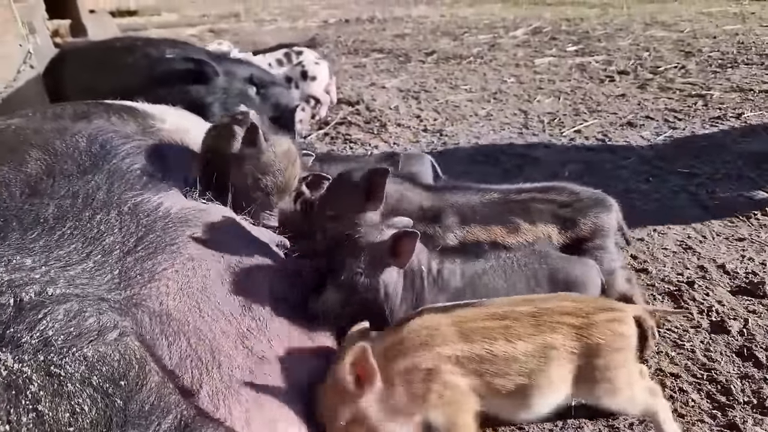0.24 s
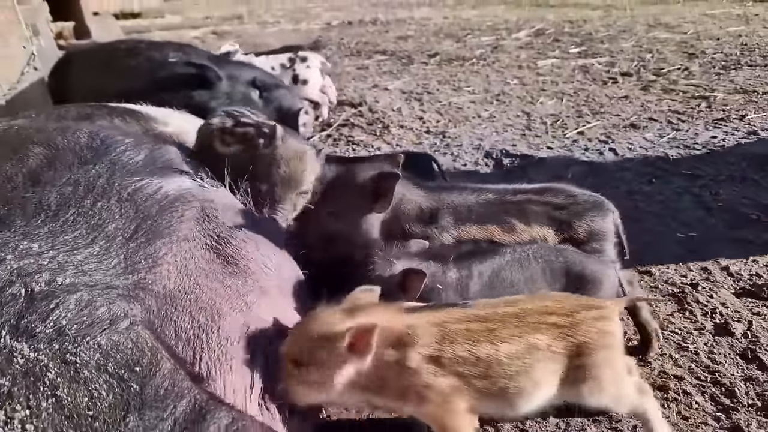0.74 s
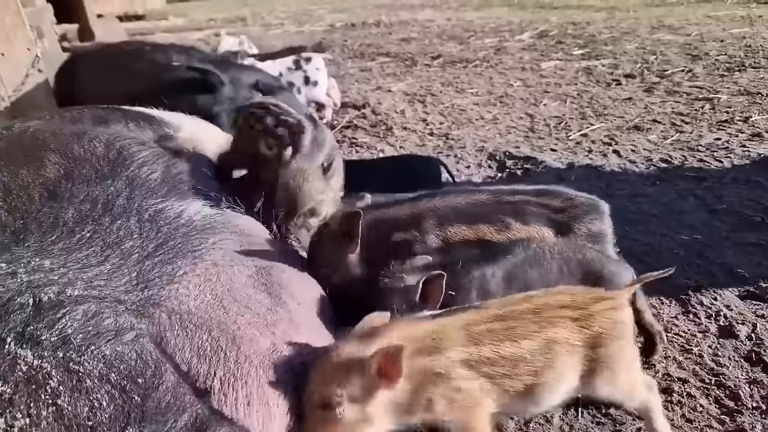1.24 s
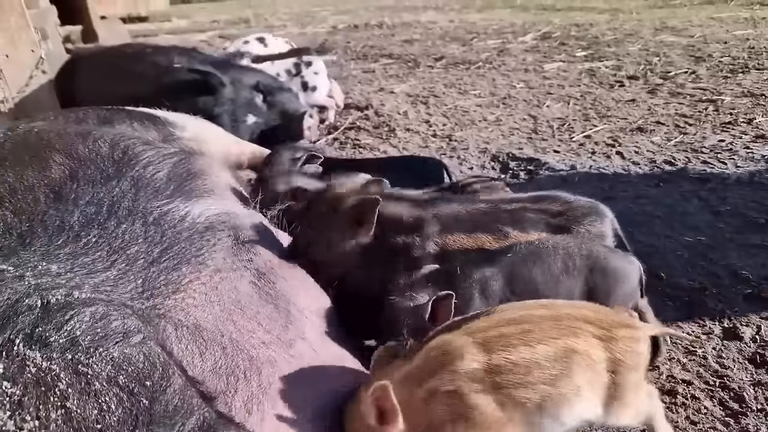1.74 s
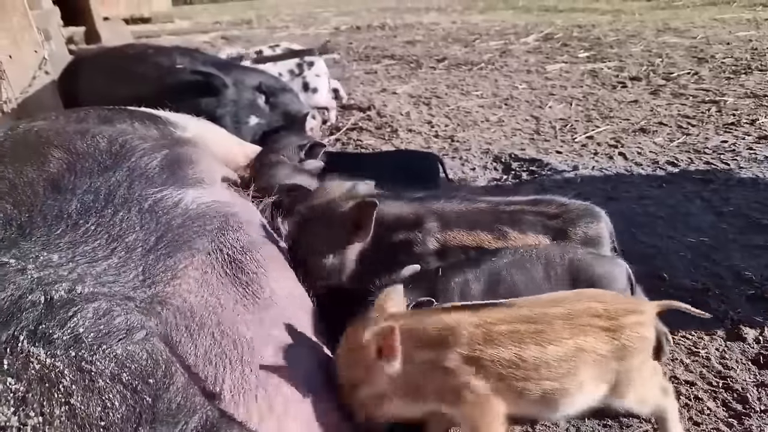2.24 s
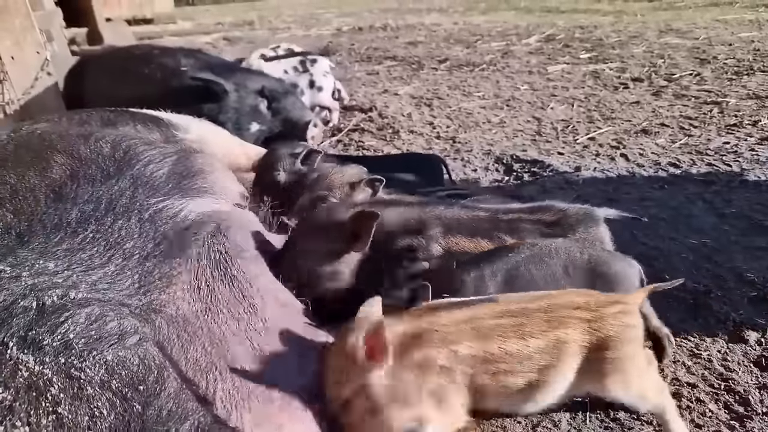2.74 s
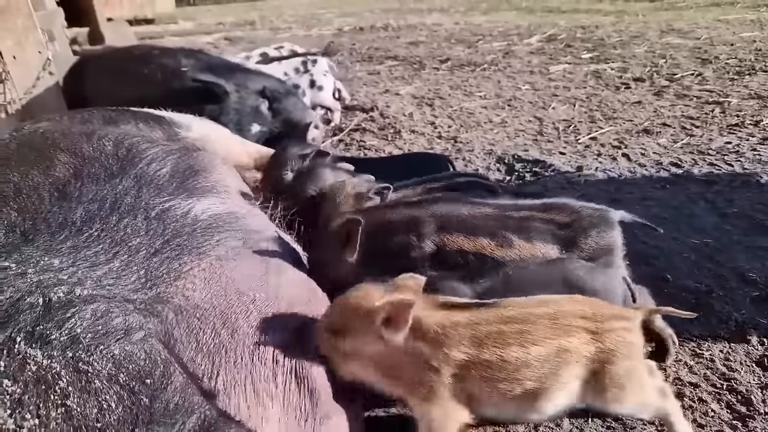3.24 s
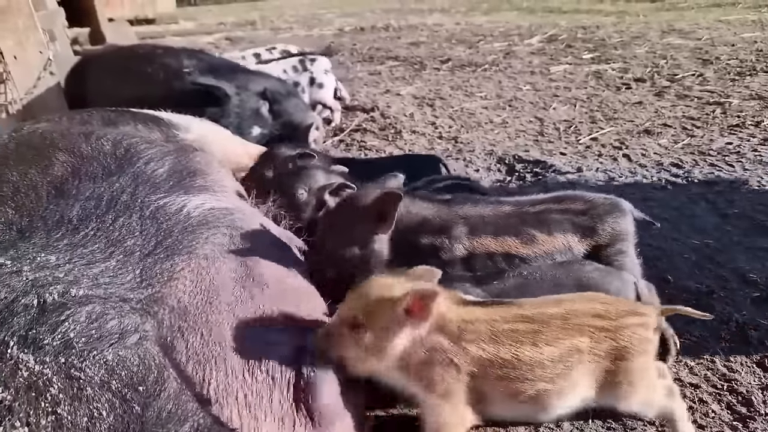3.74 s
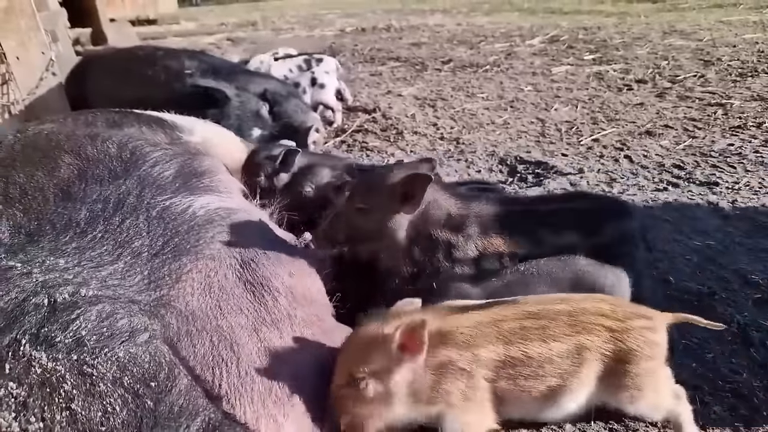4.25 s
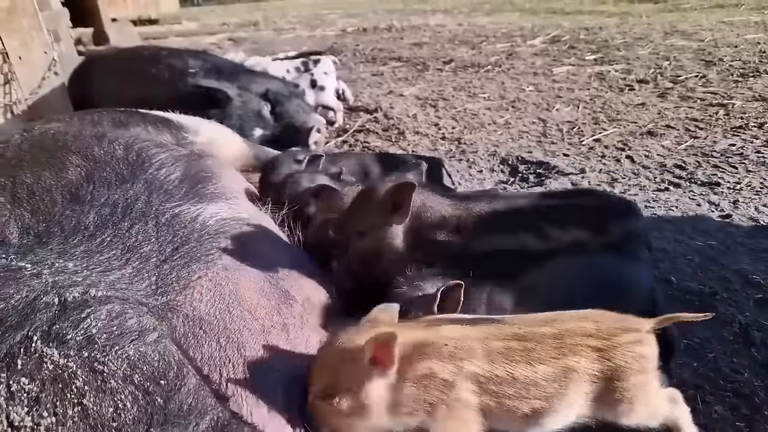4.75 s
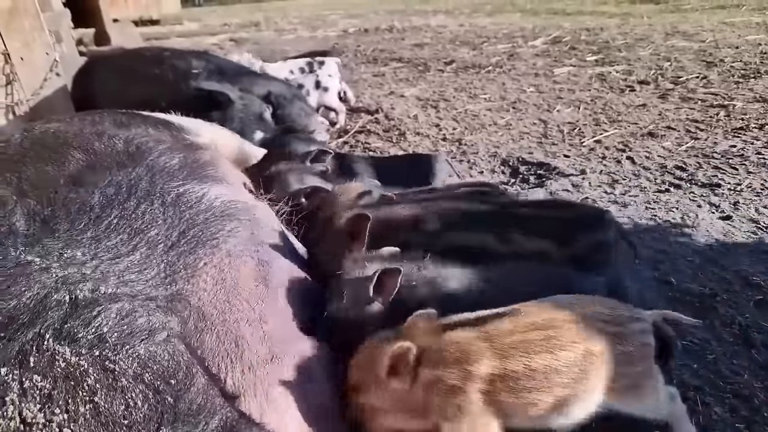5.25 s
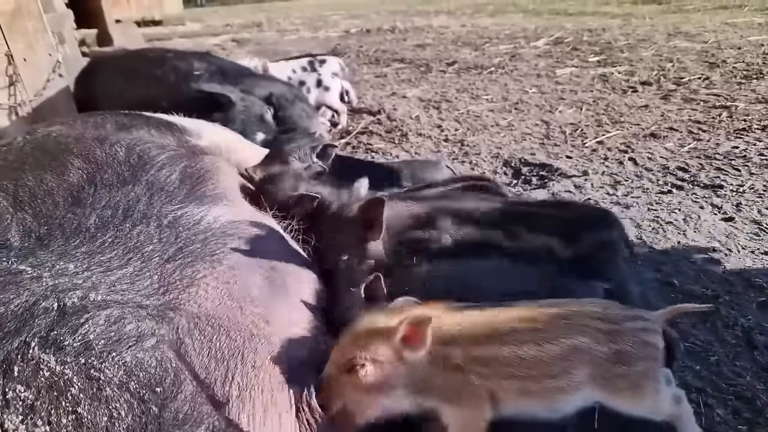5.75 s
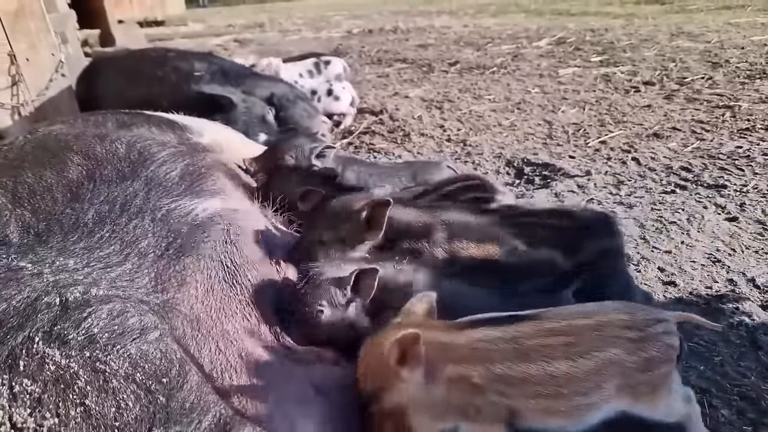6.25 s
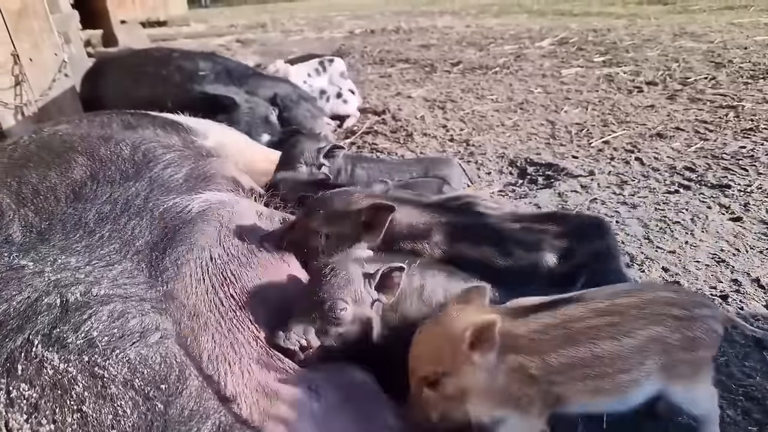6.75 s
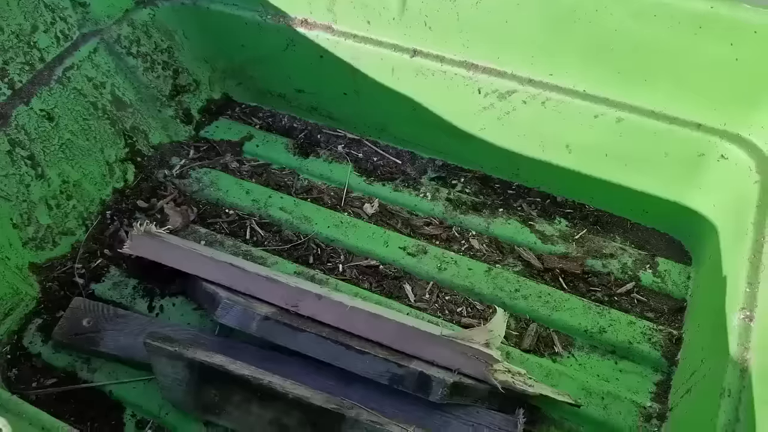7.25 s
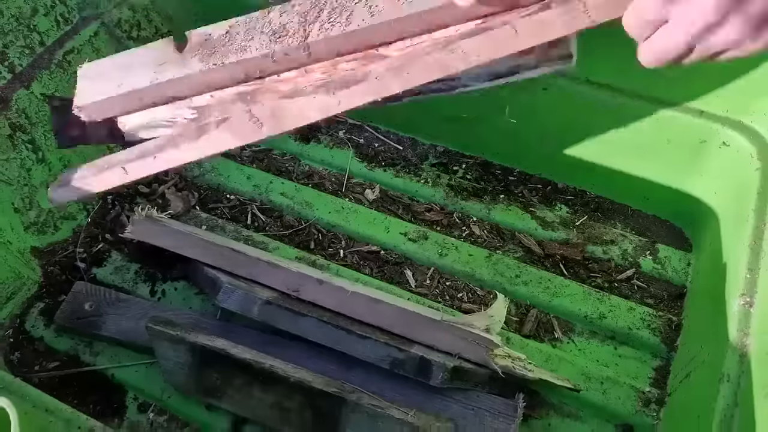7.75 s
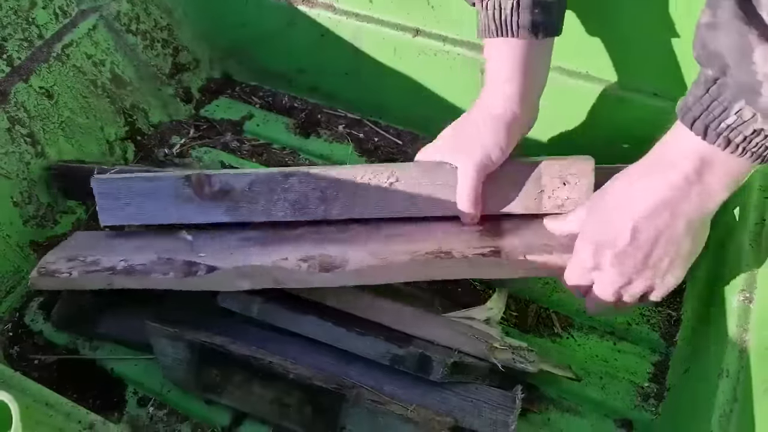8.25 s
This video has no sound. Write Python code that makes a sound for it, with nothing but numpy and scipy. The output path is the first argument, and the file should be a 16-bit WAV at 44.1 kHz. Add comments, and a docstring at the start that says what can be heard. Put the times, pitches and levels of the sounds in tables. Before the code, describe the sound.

A sunny farmyard heard close up, with low air rumble, faint rustling grit, distant leaves and wide, echoing birdsong. A sow grunts near the microphone in deep fluttering bursts: a longer one at 0.6 s, another at 1.1, short ones at 2.2 and 2.5, a run from 3.4 to 4.3, then around 4.9, 5.3 and a joined pair at 6.4. Piglets add wet little smacks, tiny grunts, dry ticks and trotter scuffs, busiest around 3 to 3.6 s, and a thin rising moan at 5.5. Birds chirp quickly around 1.5 to 2.7 s, then more sparsely. At about 7.17 s the near sound drops out for an instant and cuts to louder rustling as planks are carried, swelling near 7.7. A sharp crack comes at 7.4; from 8.0 to 8.25 wood knocks and grates on a hollow plastic tub, with final thuds near 8.45.

```python
"""A sow grunts close to the microphone: flaps of her palate puff air into airway, chest and nostrils.
Beside her, piglets suckle, scuffle and grunt on dry, ticking ground, as pops, noise bursts and buzzes.
After a brief gap in the near sound, planks are carried rustling to a plastic barrow, grate together
and knock on its tub, all as ringing resonances. Further off, songbirds whistle as gliding sines in a
wide tail, and foliage rustles as noise."""
import sys
import numpy as np
from scipy import signal
from scipy.io import wavfile
from scipy.ndimage import uniform_filter1d, minimum_filter1d

SR = 44100
rng = np.random.default_rng(int(sys.argv[2]) if len(sys.argv) > 2 else 0)


def bounce(signal):
    """Save signal as a 16-bit WAV file at the path given by the first command-line argument."""
    frames = np.transpose(np.atleast_2d(signal))
    limited = np.clip(frames, -1, 1)
    pcm = np.round(limited * 32767).astype(np.int16)
    wavfile.write(sys.argv[1], SR, pcm)


N = 375291
T = np.arange(N) / SR


def amp(db):
    """Amplitude factor for a level in dB."""
    return 10 ** (np.asarray(db) / 20)


def evened(x):
    """Scales to rms 1."""
    return x / np.sqrt(np.mean(x ** 2) + 1e-20)


def add(mix, s, sound):
    """Mixes a sound in at time s."""
    part = mix[..., round(s * SR):][..., :sound.shape[-1]]
    part += sound[..., :part.shape[-1]]


def resonate(x, hz, width):
    """A two-pole resonance; the wider it is, the sooner it dies."""
    r = np.exp(-np.pi * abs(width) / SR)
    return signal.lfilter([1 - r, 0, r - 1], [1, -2 * r * np.cos(2 * np.pi * hz / SR), r * r], x)


def through(x, peaks):
    """Resonances side by side, each ringing at its dB after a unit click; alternate signs keep valleys dark."""
    total = 0
    for k, (hz, width, db) in enumerate(peaks):
        unit_ring = resonate(x, hz, width) * SR / (2 * np.pi * width)
        total = total + (-1) ** k * amp(db) * unit_ring
    return total


def climbing(x, peaks, factor):
    """Resonances whose pitch follows a moving factor, each ringing at its dB after a unit click."""
    total = 0
    for k, (hz, width, db) in enumerate(peaks):
        turn = np.exp(2j * np.pi * np.cumsum(hz * factor) / SR)
        # shift down to zero frequency, let it decay there, shift back up
        decay = signal.lfilter([1], [1, -np.exp(-np.pi * width / SR)], x / turn)
        total = total + (-1) ** k * amp(db) * (turn * decay).real
    return total


def noise(spectrum, size, patchy_db, flicker_db):
    """Coloured noise with drifting patches and a flicker shared by all frequencies."""
    hop = size // 4
    frames, hz = N // hop + 5, np.fft.rfftfreq(size, 1 / SR)
    a, b, patches = rng.standard_normal((frames, len(hz), 3)).T
    patches = evened(uniform_filter1d(uniform_filter1d(patches, size=9, axis=0), size=15, axis=1))
    flicker = evened(uniform_filter1d(rng.standard_normal(frames), size=5))
    f, db = np.transpose(spectrum)
    colour_db = np.interp(np.log(hz + 1), np.log(f), db)[:, None]
    z = (a + 1j * b) * amp(colour_db + patchy_db * patches + flicker_db * flicker)
    return evened(signal.istft(z, nperseg=size, noverlap=size - hop)[1][:N])


# colour of the far foliage: (frequency [Hz], relative level per Hz [dB])
FOLIAGE_COLOUR = [(1200, -28), (2000, -7.5), (4000, 1), (7500, -10), (9000, -29)]
FOLIAGE_DB = -59.5


def foliage():
    """Far leaves: wide, unevenly flickering noise, opposite in the two channels."""
    leaves = amp(FOLIAGE_DB) * noise(FOLIAGE_COLOUR, size=2048, patchy_db=6.0, flicker_db=2.0)
    return np.outer([1, -1], leaves)


# birdsong further off: (time [s], length [s], start pitch [Hz], pitch it slides towards [Hz],
#                        level before waver and tail [dB])
BIRD_NOTES = [(0.418, 0.14, 6470, 6330, -48.5), (1.46, 0.044, 4520, 5250, -37),
              (1.49, 0.028, 4800, 3820, -35.5), (1.516, 0.023, 3440, 2860, -35.5),
              (1.61, 0.087, 5760, 6120, -40), (1.68, 0.028, 4700, 5100, -35),
              (1.643, 0.039, 4740, 4270, -30), (1.692, 0.027, 4470, 4340, -35),
              (1.708, 0.02, 3820, 3740, -30), (1.722, 0.027, 3320, 3020, -37),
              (1.742, 0.029, 2850, 2720, -42), (2.277, 0.051, 8200, 6900, -37),
              (2.305, 0.044, 7950, 7200, -31.5), (2.346, 0.069, 8240, 6800, -32.5),
              (2.466, 0.016, 3950, 3680, -34), (2.486, 0.025, 3240, 2950, -35),
              (2.516, 0.031, 2820, 2780, -38), (2.62, 0.027, 3950, 3500, -35),
              (2.642, 0.047, 3320, 3150, -33.5), (2.722, 0.084, 4010, 3960, -38.5),
              (3.72, 0.053, 1910, 1990, -42), (3.997, 0.079, 2700, 2230, -38), (4.2, 0.11, 3230, 3500, -42),
              (4.367, .09, 1696, 1590, -44), (4.559, 0.14, 3590, 3600, -47),
              (4.833, 0.053, 3530, 3560, -42), (5.318, 0.21, 2220, 2090, -43),
              (5.761, 0.44, 3500, 3600, -45), (6.774, 0.82, 8140, 8020, -46.5),
              (7.57, 0.11, 3240, 3840, -37), (8.244, 0.12, 7930, 8330, -41), (8.343, 0.18, 8280, 7900, -37)]
TREES_DB, TREES_T60_S = -3, .35


def birds():
    """Whistles that slide quickly towards their end pitch, with a wide tail from the trees."""
    out = np.zeros((2, N))
    for s, length, start_hz, end_hz, db in BIRD_NOTES:
        # off to one side, a note reaches one channel first [rad]
        lead = .5 + .2 * np.log2(end_hz / 2000)
        t = np.arange(0, length, 1 / SR)
        drift = rng.standard_normal((len(t), 2)).T
        wobble, waver = (evened(uniform_filter1d(v, size=300)) for v in drift)
        hz = end_hz + (start_hz - end_hz) * np.exp(-2.5 * t / length)
        hz = hz * (1 + (0.003 + 0.0106 * np.sqrt(length)) * wobble)
        whistle = np.sin(2 * np.pi * np.cumsum(hz) / SR + [[lead], [-lead]])
        loudness = amp(db + (0.1 + 5.0 * np.sqrt(length)) * waver)
        add(out, s, whistle * loudness * signal.windows.tukey(len(t), .4))
    t = np.arange(SR // 2) / SR
    tail = rng.standard_normal((2, len(t))) * amp(-60 * t / TREES_T60_S) * (t > .01)
    tail = tail / np.linalg.norm(tail[0])
    return out + amp(TREES_DB) * signal.fftconvolve(out, tail, axes=1)[:, :N]


# air at the microphone, steady in the yard, then around the barrow:
# (time [s], rustle level before faint grit [dB], low air level [dB])
AIR_LEVELS = [(0, -43, -39.5), (7.15, -40.5, -38), (7.19, -32, -37), (7.37, -32, -34), (7.7, -27.5, -42),
              (8.05, -33.5, -37), (8.28, -48, -58), (8.51, -39, -34)]
# colours of the rustle and the low air: (frequency [Hz], relative level per Hz [dB])
RUSTLE_COLOUR = [(600, 2), (1000, 3.5), (1500, 1.5), (2100, -4.5), (3300, 5.5), (5000, 4.5), (9000, -6),
                 (16000, -13)]
LOW_AIR_COLOUR = [(15, -66), (25, -25), (44, -2), (65, 0.5), (210, -16.5), (247, -10.5), (2000, -27),
                  (2600, -108)]


def near_air():
    """Rustle with faint random grit in it, over a low rumble of air, each following its own level."""
    s, rustle_db, low_db = np.transpose(AIR_LEVELS)
    rustle = noise(RUSTLE_COLOUR, size=256, patchy_db=3.5, flicker_db=2.0) + 0.42 * faint_grit()
    low = noise(LOW_AIR_COLOUR, size=1024, patchy_db=1.2, flicker_db=.6)
    return amp(np.interp(T, s, rustle_db)) * rustle + amp(np.interp(T, s, low_db)) * low


def faint_grit():
    """Random clicks of uneven strength, about 250 a second, through one broad resonance."""
    strength = amp(2.2 * rng.exponential(1, N).clip(0, 3))
    grit = rng.standard_normal(N) * strength * (rng.random(N) < 250 / SR)
    return evened(resonate(grit, 5100, 2100))


STIRS_PER_S = 18
STIR_DB, STIR_SPREAD_DB = -42.5, 6  # base level; dB per e-fold of a random size, the smallest are loudest


def stirrings():
    """Faint stirrings in straw and grit: short soft-edged sprays of noise, each in its own band."""
    out = np.zeros(N)
    for when, pitch, span, size in rng.random((round(STIRS_PER_S * N / SR), 4)):
        t = np.arange(0, 0.0021 * 14 ** span, 1 / SR)
        hz = min(1400 * 6.5 ** pitch, SR / 3)
        spray = rng.standard_normal(len(t))
        spray = evened(resonate(resonate(spray, hz, 0.2 * hz), hz, 0.2 * hz))
        edges = (t / t[-1]) ** 0.38 * (1 - t / t[-1]) ** 2
        add(out, when * N / SR, amp(STIR_DB - STIR_SPREAD_DB * np.log(size + 0.029)) * spray * edges)
    return out


# dry ticks of grit and wood near the microphone: (time [s], peak level [dB], centre [Hz])
DRY_TICKS = [(0.3, -22, 4440), (1.986, -18.5, 5450), (2.032, -15.5, 3640), (2.362, -12.5, 4740),
             (2.392, -11, 4800), (2.855, -18, 3660), (3.0706, -13.5, 3630), (3.123, -22, 3020),
             (3.3657, -13, 3160), (3.488, -9.5, 3900), (3.5503, -15, 4540), (4.2915, -17.5, 4770),
             (4.724, -20, 7660), (4.7863, -18, 4760), (5.1618, -22.5, 8250), (5.557, -18, 4330),
             (5.641, -14.5, 6800), (5.678, -8.5, 6540), (6.132, -16, 3150), (6.169, -13.5, 4430),
             (6.218, -15.5, 3200), (6.546, -19.5, 4400), (6.75, -18, 4700), (6.945, -10.5, 3540),
             (6.989, -13.5, 5800), (7.417, -7, 4600), (7.4744, -14, 6300), (8.059, -1, 4100),
             (8.1636, -10, 2820), (8.4344, -9, 2830)]


def ticks():
    """Each tick is a sharp click and a dying spray of noise around its centre."""
    out, t = np.zeros(N), np.arange(0, .05, 1 / SR)
    for s, db, hz in DRY_TICKS:
        spray = rng.standard_normal(len(t)) * amp(-60 * t / .016)
        click = 0.13 * np.diff(spray * np.exp(-t / 0.00042), prepend=0)
        ring = resonate(spray, hz, 0.32 * hz) + click
        add(out, s, amp(db) * ring / abs(ring).max())
    return out


# planks on the tub: (time [s], relative tub boom [dB], relative plank crack [dB])
PLANK_KNOCKS = [(7.415, -13.5, -6.5), (7.809, -23, -44), (7.989, 4, -17), (8.01, 1.5, -18),
                (8.112, -32, -26), (8.136, 0.5, -13), (8.148, -21, -13), (8.162, -27, -6.5),
                (8.184, 1, -16), (8.211, -4, -21), (8.434, -14, -22.5), (8.475, -11.5, -36),
                (8.497, -4, -7)]
# ringing modes of the hollow tub and of a plank: (nominal pitch [Hz], relative level [dB], T60 [s])
TUB_MODES = [(52, -13.5, 0.39), (93, -6, 0.27), (161, -0.5, 0.17), (195.3, 12.5, 0.064), (268, -17, 0.098)]
PLANK_MODES = [(332, 12, 0.021), (453, 3, 0.037), (620, 1.5, 0.04), (820, -3, 0.055), (1313, -10.5, 0.056)]


def knocks():
    """Each blow rings the tub softly and the planks sharply, with other weights and slightly other pitch."""
    out, t = np.zeros(N), np.arange(0, .5, 1 / SR)
    for s, tub_db, plank_db in PLANK_KNOCKS:
        for modes, db, rise in (TUB_MODES, tub_db, .004), (PLANK_MODES, plank_db, .0015):
            ring = np.zeros(len(t))
            for (hz, mode_db, t60), w in zip(modes, rng.normal(0, 1.5, len(modes))):
                ring += amp(mode_db + w - 60 * t / t60) * np.sin(2 * np.pi * hz * (1 + 0.032 * w) * t)
            add(out, s, amp(db - 3.0) * ring * (1 - np.exp(-t / rise)))
    return out


# planks grating together, silent outside these times: (time [s], relative level [dB])
GRATING_LEVEL = [(8.0, -34), (8.09, -33.5), (8.18, -21), (8.23, -31), (8.42, -71)]
# rough faces scratching: (frequency [Hz], width [Hz], relative level [dB])
SCRATCH_PEAKS = [(1310, 500, -3.5), (2040, 280, -6), (3700, 330, -2), (4900, 760, 0)]


def grating():
    """Random slips, about 600 a second, ring the planks, the tub and the scratching faces."""
    slips = rng.standard_normal(N) * (rng.random(N) < 600 / SR)
    planks = evened(through(slips, [(hz, 90, db) for hz, db, _ in PLANK_MODES]))
    tub = evened(through(slips, [(hz, 40, db) for hz, db, _ in TUB_MODES]))
    scratch = evened(through(slips, SCRATCH_PEAKS))
    level = amp(np.interp(T, *np.transpose(GRATING_LEVEL), left=-np.inf, right=-np.inf))
    return (planks + 2.7 * tub + 0.52 * scratch) * level


# trotters scuffing the ground, later planks scraping:
# (time [s], relative level [dB], decay length [s], centre [Hz])
GROUND_SCUFFS = [(0.448, -29, 0.012, 4320), (1.6, -21, 0.06, 3630), (1.989, -22.5, 0.0093, 7300),
                 (2.384, -27.5, 0.093, 5400), (2.685, -25, 0.039, 4050), (2.886, -33.5, 0.11, 4660),
                 (3.081, -12, 0.017, 6500), (3.198, -26, 0.046, 4860), (3.225, -17, 0.013, 6400),
                 (3.331, -29, 0.027, 5000), (3.4184, -15.5, 0.016, 5730), (4.423, -30, 0.013, 6940),
                 (4.744, -28, 0.037, 4800), (5.6055, -26, 0.018, 4560), (5.832, -18.5, 0.032, 4480),
                 (6.336, -28, 0.06, 4640), (8.006, -20.5, 0.042, 4180)]


def scuffs():
    """Bursts of gritty noise through two broad resonances, quick to start and fading as a bell curve."""
    out = np.zeros(N)
    for s, db, length, hz in GROUND_SCUFFS:
        t = np.arange(0, 2.5 * length, 1 / SR)
        grit = rng.standard_normal(len(t)) * amp(5.2 * rng.exponential(1, len(t)).clip(0, 5))
        scrape = evened(resonate(resonate(grit, 0.88 * hz, 0.47 * hz), hz, 1.95 * hz))
        fade = np.minimum(t / 0.0014, 1) * np.exp(-(t / length) ** 2)
        add(out, s, amp(db - 5.0) * scrape * fade)
    return out


# short pops: wet smacks of suckling, and one high narrow tick at 5.401 s:
# (time [s], relative level [dB], starting pitch [Hz])
SHORT_POPS = [(0.143, -30.5, 790), (0.347, -31.5, 684), (2.034, -33, 1600), (2.053, -30, 990),
              (3.031, -34, 960), (3.217, -28, 1250), (5.401, -25.5, 3590), (6.133, -30.5, 1200),
              (6.179, -30.5, 950), (6.748, -24.5, 1210)]


def pops():
    """Short pops of rising pitch, each with a wide snap of noise."""
    out, t = np.zeros(N), np.arange(0, .03, 1 / SR)
    for s, db, hz in SHORT_POPS:
        pop = np.sin(2 * np.pi * hz * t * (1 + 6 * t))
        add(out, s, amp(db) * pop * (t / 0.00063) * np.exp(1 - t / 0.0016))
        snap = rng.standard_normal(len(t)) * np.exp(-t / .003)
        add(out, s, amp(db - 17.5) * evened(resonate(snap, 0.54 * hz, 2300)))
    return out


# small piglet grunts: (time [s], length [s], level before fades [dB], resonance [Hz])
PIGLET_GRUNTS = [(0.362, 0.12, -34, 364), (3.316, 0.048, -24, 367), (4.499, 0.018, -30.5, 394),
                 (6.035, 0.067, -35.5, 325)]
# one thin rising piglet moan: (time [s], length [s], start [Hz], end [Hz], level of its fundamental [dB])
PIGLET_MOAN = (5.52, .155, 270, 480, -35)


def piglet_voices():
    """Small grunts are noise buzzing 70 times a second in one resonance; the moan is two gliding harmonics."""
    out = np.zeros(N)
    for s, length, db, hz in PIGLET_GRUNTS:
        t = np.arange(0, length, 1 / SR)
        buzz = rng.standard_normal(len(t)) * (1.3 + np.exp(-(t * 70 % 1) / 1.6))
        add(out, s, amp(db) * evened(resonate(buzz, hz, 153)) * np.sin(np.pi * t / length))
    s, length, start_hz, end_hz, db = PIGLET_MOAN
    t = np.arange(0, length, 1 / SR)
    turn = 2 * np.pi * np.cumsum(start_hz + (end_hz - start_hz) * (t / length) ** 1.2) / SR
    add(out, s, amp(db) * (np.sin(turn) + 0.34 * np.sin(2 * turn)) * np.sin(np.pi * t / length))
    return out


YARD_DB, YARD_T60_S = -15, .2


def yard(x):
    """Walls and ground throw the grunts back as a short dying spray."""
    t = np.arange(SR // 3) / SR
    tail = rng.standard_normal(len(t)) * amp(-60 * t / YARD_T60_S) * (t > .004)
    return x + amp(YARD_DB) * signal.fftconvolve(x, tail / np.linalg.norm(tail))[:N]


# airway with the mouth shut and open, before each grunt's own factor:
# (frequency [Hz], width [Hz], relative level [dB])
SHUT_AIRWAY = [(371, 41, 6.5), (435, 88, 3), (1002, 120, -6), (1840, 40, -35)]
OPEN_AIRWAY = [(435.5, 50.7, 5.5), (559, 71, 5.5), (627, 82, 0), (979, 120, -3.5), (1402, 23, -39),
               (2020, 83, -54)]
# resonances that climb while the palate lifts: (frequency at the flap [Hz], width [Hz], relative level [dB])
PALATE_PEAKS = [(545, 29, -12), (817, 79, -10.5)]
# sings late and softly with the mouth shut: (frequency before the factor [Hz], width [Hz], relative level [dB])
SINUS_PEAK = (1365, 99, -10)
PALATE_CLIMB = 22.2  # share per second by which the palate resonances rise after a flap
PIPE_HZ, PIPE_WIDTH_HZ = 2750, 156  # a narrow rasp in the open throat


def airway(drive, puff, mouth, effort, since, scale, rasp_db):
    """The shut and the open airway ring side by side, shared out by the mouth opening."""
    shut, opened = drive * np.sqrt(1 - mouth), drive * np.sqrt(mouth)
    stretch = np.array([scale, 1, 1])
    tract = through(shut, SHUT_AIRWAY * stretch) + through(opened, OPEN_AIRWAY * stretch)
    palate = climbing(shut, PALATE_PEAKS, 1 + PALATE_CLIMB * since)
    pipe = through(opened + 0.0067 * puff * mouth, [(PIPE_HZ, PIPE_WIDTH_HZ, rasp_db)])
    hz, width, sinus_db = SINUS_PEAK
    # two resonances in a row build up late
    sinus = through(resonate(shut * np.sqrt(effort), hz * scale, width), [(hz * scale, width, sinus_db)])
    return tract + palate + pipe + 2 * sinus


# chest, the last one only with a shut mouth: (frequency [Hz], width [Hz], relative level [dB])
CHEST_PEAKS = [(73.6, 17.5, -3), (141.5, 34.6, 1.5), (188, 16.5, 0.5)]
GULP_DB = -3.5  # the chest thumps once as an open mouth shuts, relative to the grunt


def chest(flaps, puff, mouth, db, gulp_s):
    """The chest takes each puff as a slow push."""
    push = flaps * amp(2.5 * mouth) + .005 * puff
    add(push, gulp_s, amp([db + GULP_DB]) * mouth[-1])
    surge = np.hanning(round(0.0066 * SR))
    push = np.convolve(push, surge / surge.sum())[:len(mouth)]
    return through(push, CHEST_PEAKS[:-1]) + through(push * (1 - mouth), CHEST_PEAKS[-1:])


# nostrils: (frequency at the flap [Hz], width [Hz], relative level [dB])
NOSTRIL_PEAKS = [(2826, 900, 12), (3290, 560, 7.4), (3940, 400, 8.8), (4590, 700, 10)]
# breath in the open mouth: (frequency [Hz], width [Hz], relative level [dB])
BREATH_PEAKS = [(1440, 310, -15), (2230, 390, -13.5), (5600, 380, -17.5)]
NOSTRIL_CLIMB = 8  # share per second by which the hiss rises after a flap
HISS_SCATTER_DB, HISS_EFFORT = 1.8, 0.52  # differs from puff to puff; extra growth with the grunt [dB per dB]


def breath(air, mouth, force, since, scatter):
    """Air hisses in the nostrils, strongest with the mouth shut, and rasps in the open mouth."""
    hiss = air * amp(-9.5 - 10.4 * mouth + HISS_SCATTER_DB * scatter) * force ** HISS_EFFORT
    hiss = climbing(hiss, NOSTRIL_PEAKS, 1 + NOSTRIL_CLIMB * since)
    return hiss + through(air * mouth ** 2, BREATH_PEAKS)


# the sow, close by: (start [s], loudest [s], end [s], palate flaps at start, loudest and end [Hz],
# strength [dB], mouth opening [0-1], factor on the airway resonances [1], relative throat rasp [dB])
SOW_GRUNTS = [(.596, .70, 1.04, 38.8, 37.3, 33.9, -7, .15, .983, -20),
              (1.097, 1.18, 1.28, 23.4, 43.1, 35.3, -8, .95, 1.028, -28),
              (2.195, 2.285, 2.385, 42, 33.3, 30.6, -10, .1, 1.001, -20),
              (2.476, 2.55, 2.705, 27.9, 41.2, 36.7, -7, .97, 1.001, -15),
              (3.447, 3.51, 3.74, 28, 29.7, 20.6, -12.5, .2, .99, -20),
              (3.761, 3.81, 3.925, 29.1, 46.4, 37.1, -9, .8, .99, -8),
              (3.949, 3.96, 4.35, 22, 23.2, 20.8, -14, .1, .99, -20),
              (4.919, 4.96, 5.075, 34.4, 40.8, 30.6, -10.5, .9, 1.001, -6),
              (5.262, 5.305, 5.37, 44, 41, 36, -14, .1, .98, -20),
              (5.345, 5.42, 5.505, 40.7, 47.4, 27.6, -8.5, .15, .98, -20),
              (6.35, 6.44, 6.516, 29.9, 41.2, 37, -8, .9, 1.004, -14),
              (6.511, 6.535, 6.705, 27, 35.4, 33.8, -9, .1, 1.004, -20)]
# every grunt swells quickly, holds, sags slowly and is cut short
SWELL_DB_PER_S, HOLD_S, SAG_DB_PER_S, RELEASE_S = 118, 0.053, 29, 0.0347
START_MOUTH, MOUTH_WAVER = 0.47, 0.19  # the mouth starts about half open and never holds quite still


def grunt(start, loudest, end, start_hz, top_hz, end_hz, db, mouth, scale, rasp_db):
    """Each flap of the palate lets out a puff that rings the airway, the chest and the nostrils."""
    t = np.arange(start, end + .1, 1 / SR)
    draws = rng.standard_normal((len(t), 3))
    swell_db = SWELL_DB_PER_S * (loudest - t).clip(0)
    sag_db = SAG_DB_PER_S * (t - loudest - HOLD_S).clip(0)
    force = amp(db - swell_db - sag_db) * np.clip((end - t) / RELEASE_S, 0, 1)
    mouth = np.interp(t, [start, loudest], [START_MOUTH, mouth])
    mouth = np.clip(mouth + MOUTH_WAVER * evened(uniform_filter1d(draws[:, 2], size=1000)), 0, 1)
    rate = np.interp(t, [start, loudest, end], [start_hz, top_hz, end_hz])
    turns = np.cumsum(rate) / SR
    since = turns % 1 / rate  # seconds since the last flap
    flaps = (np.diff(np.ceil(turns), prepend=0) > 0) * amp(.8 * draws[:, 0]) * force
    rebound = np.roll(flaps, round(.009 * SR)) * (.5 - 0.43 * mouth)  # the palate slaps back once
    rebound += np.roll(flaps, round(0.021 * SR)) * 0.38 * mouth  # and again with the mouth open
    puff = (np.exp(-since / 0.023) + 0.47 + 0.86 * mouth) * draws[:, 1] * force
    # tissue closes within half a millisecond
    soft = np.hanning(round(.0004 * SR))
    drive = np.convolve(flaps + rebound, soft / soft.sum(), "same") + .008 * puff
    jet = np.sqrt(since / 0.005) * np.exp(-since / 0.0041) * draws[:, 1] * force
    air = 0.57 * flaps + 0.19 * jet + 0.01 * puff
    scatter = draws[turns.astype(int), 0]  # one draw for each puff
    voice = airway(drive, puff, mouth, force / amp(db), since, scale, rasp_db)
    body = chest(flaps, puff, mouth, db, end - start - RELEASE_S / 2)
    return t[0], voice + body + breath(air, mouth, force, since, scatter)


def scene():
    """Near sounds sit in the middle, with a gap between the two places; birds and foliage play on, wide."""
    sow = np.zeros(N)
    for row in SOW_GRUNTS:
        add(sow, *grunt(*row))
    piglets = scuffs() + pops() + piglet_voices()
    barrow = knocks() + grating()
    near = yard(sow) + piglets + barrow + ticks() + stirrings() + near_air()
    gap = np.interp(T, [7.152, 7.16, 7.187, 7.192], [0.87, 0.094, 0.068, 0.92])
    return near * gap + birds() + foliage()


EDGE_HZ = 15800  # upper band limit


def record(dry):
    """Bass roll-off, a limiter that turns the gain down around peaks near full scale, then the band limit."""
    dry = signal.lfilter(*signal.butter(3, 38, "high", fs=SR), dry)
    room = np.minimum(.99 / (abs(dry).max(0) + 1e-9), 1)
    held = dry * uniform_filter1d(minimum_filter1d(room, size=301), size=151)
    band = signal.firwin(511, EDGE_HZ, window=("kaiser", 9), fs=SR)
    return signal.oaconvolve(held, band[None], "same")


dry = scene()
out = record(dry)
bounce(out)
```